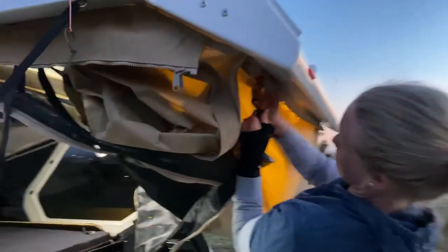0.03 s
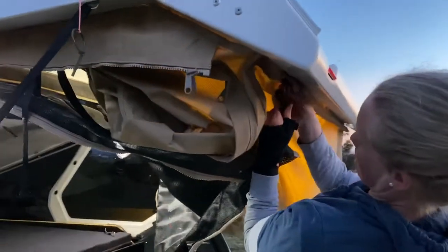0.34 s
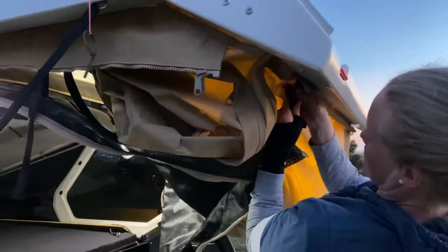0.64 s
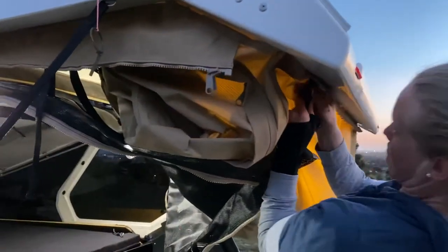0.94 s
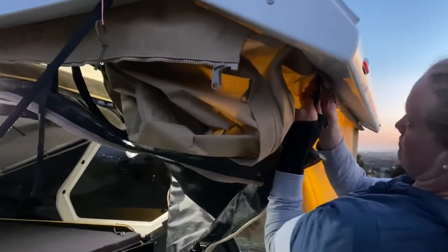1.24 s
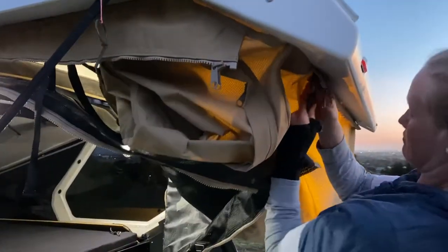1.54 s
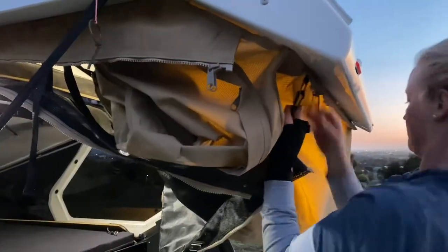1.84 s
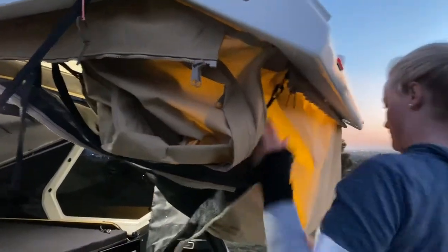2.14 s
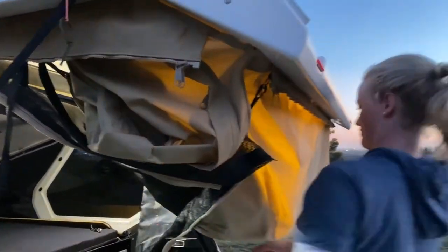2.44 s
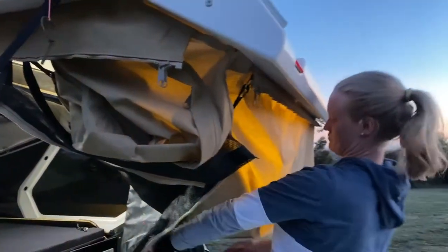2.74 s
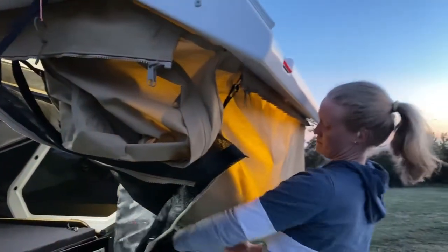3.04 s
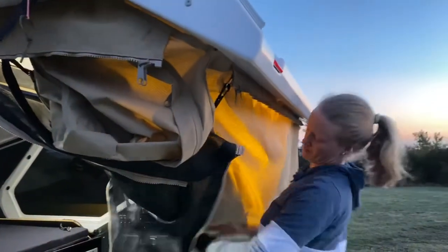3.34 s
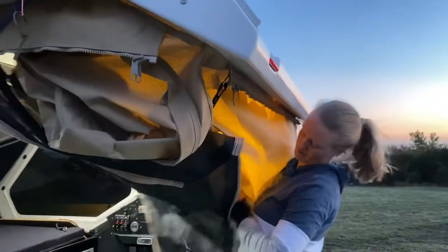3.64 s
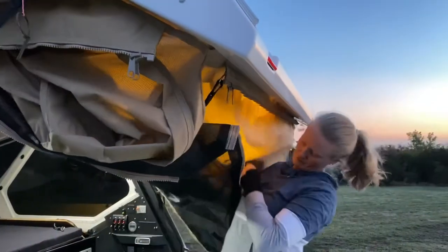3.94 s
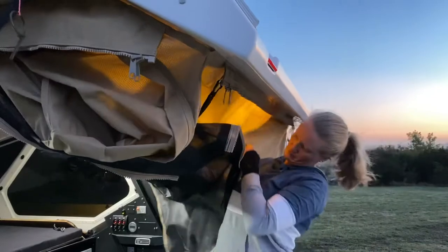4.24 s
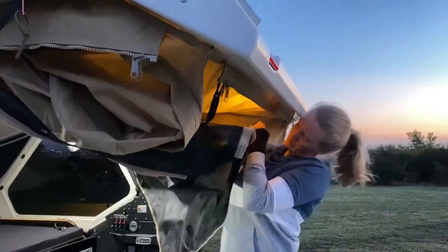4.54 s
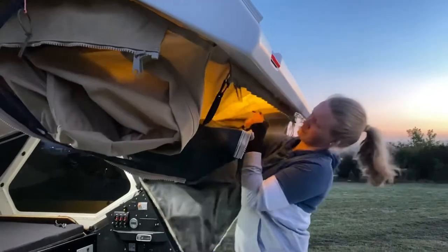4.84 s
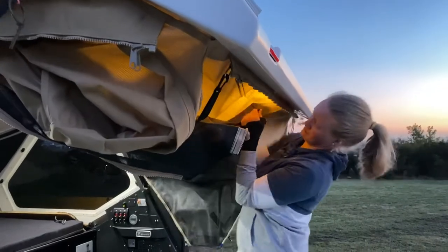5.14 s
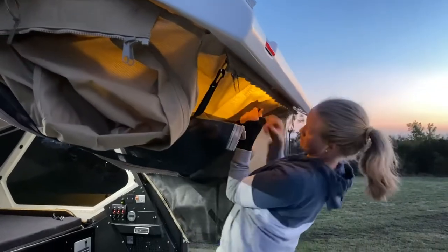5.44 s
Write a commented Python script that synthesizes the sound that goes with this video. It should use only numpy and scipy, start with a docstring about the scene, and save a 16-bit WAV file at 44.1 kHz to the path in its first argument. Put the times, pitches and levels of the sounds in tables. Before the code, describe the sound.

Outdoors, wind rumbles on the microphone as a nearby buckle clinks and heavy cloth flaps. After about a second comes one sharp click from a strap clip. The tent canvas then rubs and ticks quietly, swells into a long rustling pull and ends with a few more strokes and soft pats. Faint insects trill in the grass over a low hum.

```python
"""A field at dusk, where a canvas tent is tucked into its hard shell an arm's length away.
Stick-slip friction makes the cloth rub and hiss; creases tick, and flaps push the air in low pulses.
A metal buckle knocks and jingles in its free modes, and a strap clip snaps shut.
Wind rumbles at the microphone, two insects stridulate in the grass and a far bird peeps,
over a faint low hum."""
import sys
import numpy as np
from scipy import signal
from scipy.fft import rfft, irfft
from scipy.io import wavfile
from scipy.ndimage import uniform_filter1d

SR = 44100
rng = np.random.default_rng(int(sys.argv[2]) if len(sys.argv) > 2 else 0)


def put_to_file(sound):
    """Save the sound as 16-bit audio at rate SR, in the file named by the first command-line argument."""
    columns = np.atleast_2d(sound).T  # one column per channel
    safe = np.clip(columns, -1, 1)
    whole_steps = np.round(safe * 32767)
    wavfile.write(sys.argv[1], SR, whole_steps.astype(np.int16))


N = 246651
T = np.arange(N) / SR

# short hand strokes over the cloth: t/s, duration/s, level/dB, swell from start to end/dB, tautness/dB
HAND_STROKES = [(0.0, 0.29, -48, -7.5, -1), (0.378, .23, -60, 5, 3.5), (0.769, 0.016, -55, -2.5, -4.5),
                (0.846, 0.025, -64, 3, 3.5), (0.986, 0.011, -60.5, 5.5, 3.5), (1.144, 0.14, -60, -5.5, -.5),
                (1.405, 0.425, -59.5, 5, -3), (1.649, 0.019, -59.5, 5, 9.5), (1.865, 0.086, -51, -1, -1),
                (1.984, 0.15, -55.5, 1.5, 6.5), (2.172, 0.33, -64, -4, -3), (2.602, 0.012, -65.5, 4, 18),
                (3.016, 0.048, -65, 2, 6.5), (3.178, 0.12, -53, 3.5, -3), (4.617, .31, -48.5, -0.5, -0.5),
                (4.957, 0.13, -45.5, -1, 2.5), (5.111, 0.047, -51.5, -2, 10), (5.227, .37, -58.5, 3, 2)]
# the long pull that drags the canvas under the shell: t/s, level/dB, tautness/dB
LONG_PULL = [(3.3, -69, -3), (3.36, -47.5, 2), (3.52, -43.5, 1.5), (3.62, -40.5, 5.5), (3.82, -38.5, 3),
             (4.0, -43, 0.5), (4.27, -43, 1), (4.38, -38.5, -2.5), (4.46, -43, -1), (4.52, -56, -2.5),
             (4.6, -53.5, -1.5)]
# gusts at the microphone: t/s, half-width/s, level/dB
WIND_GUSTS = [(0.0, 0.08, -27.5), (0.153, 0.056, -33.5), (.42, 0.063, -41), (0.618, 0.061, -39),
              (1.376, 0.16, -53), (2.674, 0.1, -46.5), (3.303, 0.17, -52), (4.1, 0.42, -52),
              (5.246, 0.33, -46.5)]
# envelopes: t/s, level/dB
HUM_ENVELOPE = [(0, -39), (.5, -49), (.9, -47.5), (1.2, -59), (1.6, -56.5), (4.6, -57), (5.59, -51)]
TRILL_ENVELOPE = [(0, -60), (1.7, -71), (2.7, -55), (3.3, -58.5), (5.59, -67)]
# touches of the buckle on its fitting: t/s, relative level/dB, spectral tilt/(dB per octave)
BUCKLE_TOUCHES = [(0.018, -38, 4), (0.0607, -32, -7), (0.089, -33.5, 2), (.102, -36.5, 4), (0.165, -43, -3),
                  (.211, -40, 7), (.221, -38, 4), (.334, -53, -1), (1.912, -42, 9)]
# normal modes of the buckle: f/Hz, relative level/dB, T60/s
BUCKLE_MODES = [(3850, -5, 0.077), (3900, -3.5, 0.073), (4635, -9, 0.065), (4840, -18, .08),
                (6170, -2, 0.044), (6250, -14, 0.32), (7200, -11, 0.073), (7390, -4, 0.056),
                (7950, -22, 0.036), (8750, -10, 0.09), (8740, -11, 0.09), (11940, -17, 0.13),
                (14900, -21, .1)]
# flaps of the cloth: t/s, relative level/dB, f/Hz
CLOTH_FLAPS = [(0.019, -31, 150), (0.067, -35, 82.5), (0.119, -19.5, 130), (0.141, -20, 58.7),
               (0.169, -34, 76.6), (0.199, -20, 97.4), (0.216, -23.5, 62), (0.388, -31, 65.5),
               (0.424, -31.5, 169), (0.503, -32.5, 73), (0.625, -27.5, 102.6), (0.652, -27.5, 87.4),
               (1.206, -31, 151), (1.23, -34.5, 182), (1.879, -36.5, 122), (2.146, -30, 136),
               (2.325, -33, 151), (2.6, -40, 169), (2.65, -28.5, 72), (2.691, -42, 104),
               (3.142, -35.5, 165), (3.682, -32.5, 90), (4.225, -34, 169), (4.365, -35, 201),
               (5.12, -25, 165), (5.138, -28.5, 80), (5.17, -28.5, 149), (5.199, -28, 67.4),
               (5.255, -30.5, 143), (5.464, -34, 105)]
# ticks of creases and fittings: t/s, level/dB, centre f/Hz, prominence of the centre/dB
CREASE_TICKS = [(.087, -38, 13700, 17), (.2875, -40.5, 6200, 26), (0.4164, -30.5, 1480, -25),
                (.400, -42, 5000, 0), (.4405, -43, 6140, 12), (2.124, -33, 1480, -18),
                (2.435, -39, 2520, 18), (2.712, -52, 7900, 29), (2.776, -42.5, 3000, 15),
                (2.780, -48.5, 7850, 16), (2.828, -48.5, 7760, 29), (5.381, -46, 5000, 1),
                (5.4443, -32.5, 1500, -15), (5.560, -34.5, 900, 3)]
# bouts of the near insect: start t/s, end t/s, chirp rate/Hz, level/dB
CHIRP_BOUTS = [(.49, 1.17, 15.8, -53.5), (1.371, 1.9, 15.6, -57), (1.927, 2.67, 15.72, -52),
               (5.205, 5.59, 15.1, -51)]
# peeps of the far bird: t/s, start f/Hz, end f/Hz, duration/s, level/dB
BIRD_PEEPS = [(1.252, 5750, 6450, .028, -62), (1.285, 6550, 5850, .065, -67)]
# spectral densities: f/Hz, relative level/dB
WEAVE_SPECTRUM = [(240, -38.5), (400, 0.5), (549, 5), (678, 6), (941, 0), (1300, 1), (1630, -4.5),
                  (2310, -6), (2710, -6.5), (2980, -9.5), (3450, -8.5), (5000, -21.5), (6500, -33),
                  (11000, -120)]  # rubbing weave
THREAD_SPECTRUM = [(2940, -16.5), (5000, -5.5), (7980, -6), (9280, -15.5), (10300, -24.5), (10800, -24.5),
                   (11800, -23), (13200, -15), (13800, -13), (16000, -29)]  # taut threads
FLUTTER_SPECTRUM = [(20, -43), (70, -14), (130, 2.5), (200, 4), (300, 1), (390, -8.5), (600, -24),
                    (2000, -75)]  # slack cloth
WIND_SPECTRUM = [(8, -45), (25, -24), (38, -5.5), (55, -0.5), (75, 2.5), (100, 2), (140, -4), (250, -29.5),
                 (1000, -69)]  # air at the microphone
FIELD_SPECTRUM = [(25, -45), (60, -5.5), (100, -7), (200, -12.5), (350, -13), (600, -15), (1000, -12),
                  (1600, -26), (2700, -30), (3600, -20), (4600, -29), (7400, -33), (10500, -49.5),
                  (14000, -35), (16000, -43)]  # distant evening wash
KNOCK_SPECTRUM = [(100, -29), (700, -20), (1150, 1.5), (2000, 3.5), (2700, 2), (3900, 2), (6200, 2),
                  (7500, -6), (8800, -21), (10500, -31), (13000, -26), (16000, -32)]  # buckle on the frame
PAT_SPECTRUM = [(60, -23), (160, -5.5), (280, 2), (400, -12), (700, -19), (2000, -34), (6000, -60)]  # a flap landing
LATCH_SPECTRUM = [(100, 1.5), (400, -12), (750, 4), (1100, -11.5), (1900, -23), (2500, -0.5), (3000, 1.5),
                  (3800, 0), (4900, -5.5), (5700, -2), (6900, -4.5), (8500, -15), (11500, -16.5),
                  (14500, -12), (16000, -8)]  # latch of the strap clip


def undb(db):
    """Amplitude ratio for a level in decibels."""
    return np.exp(np.asarray(db) * np.log(10) / 20)


def unit(x):
    """Normalisation to unit rms."""
    return x / np.sqrt(np.mean(x ** 2))


def contour(table):
    """Linear interpolation of a level over time."""
    return np.interp(T, *np.transpose(table))


def colour(x, spectrum, size=8192):
    """Minimum-phase filtering with the given spectral shape and unit power gain."""
    hz, db = np.transpose(spectrum)
    f = np.maximum(np.arange(size // 2 + 1) * SR / size, 1)
    magnitude = unit(undb(np.interp(np.log(f), np.log(hz), db)))
    cepstrum = irfft(np.log(magnitude))
    cepstrum[1:size // 2] *= 2  # folding the cepstrum makes the filter causal
    cepstrum[size // 2 + 1:] = 0
    return signal.oaconvolve(x, irfft(np.exp(rfft(cepstrum))))[:len(x)]


def walk(rate_hz):
    """Smooth random modulation of unit rms."""
    hold = max(int(SR / rate_hz), 1)
    steps = np.repeat(rng.standard_normal(N // hold + 1), hold)
    return unit(uniform_filter1d(steps, hold)[:N])


def fade(t, t60):
    """Exponential decay, 60 dB down after t60."""
    return np.exp(-np.log(1000) * t / t60)


def add(out, s, x):
    """Superposition of x on out from time s."""
    i = int(s * SR)
    x, i = x[max(-i, 0):], max(i, 0)
    out[i:i + len(x)] += x[:max(N - i, 0)]


def slips(rate_hz, spread_db):
    """Shot noise: threads slip over threads in random impulses of unequal size."""
    size = undb(spread_db * np.minimum(rng.exponential(size=N), 5))
    return unit((rng.random(N) < rate_hz / SR) * size * rng.standard_normal(N))


def impact(spectrum, crack_t60, tail_db, tail_t60):
    """Impulsive excitation: a brief crack, then its scatter under the shell; peak near 1."""
    t = T[:SR // 4]
    grain = np.sign(rng.standard_normal(len(t)))
    hit = colour(grain * (fade(t, crack_t60) + undb(tail_db) * fade(t, tail_t60)), spectrum)
    return hit / (2 * np.sqrt(np.mean(hit[:SR // 500] ** 2)))


def glide(start_hz, end_hz, length_s):
    """A linear frequency sweep, slightly detuned at random, under a half-sine envelope."""
    progress = np.linspace(0, 1, int(length_s * SR))
    hz = (start_hz + (end_hz - start_hz) * progress) * (1 + 0.013 * rng.standard_normal())
    return np.sin(np.pi * progress) * np.sin(2 * np.pi * np.cumsum(hz) / SR)


def handling(attack_s=0.031, release_s=0.054, resting_db=-64.5):
    """Incoherent addition: the powers of all strokes sum, and tautness is their power-weighted mean."""
    t = np.arange(0, T[-1], .002)
    pull_s, pull_db, pull_taut = np.transpose(LONG_PULL)
    pull = np.interp(t, pull_s, undb(pull_db), left=0, right=0) ** 2
    power = undb(resting_db) ** 2 + pull  # the cloth never lies quite still
    weighted_taut = pull * np.interp(t, pull_s, pull_taut)
    for s, length, db, swell_db, taut_db in HAND_STROKES:
        outside = np.maximum(s - t, 0) / attack_s + np.maximum(t - s - length, 0) / release_s
        from_middle = np.clip((t - s) / length - .5, -.5, .5)
        stroke = (undb(db + swell_db * from_middle) * np.exp(-outside - outside ** 2 / 2)) ** 2
        power += stroke
        weighted_taut += stroke * taut_db
    return np.interp(T, t, 10 * np.log10(power)), np.interp(T, t, weighted_taut / power)


def canvas(split_hz=1550):
    """Stick-slip friction of the weave: taut cloth rasps and hisses, slack cloth flutters."""
    rub_db, taut_db = handling()
    weave = colour(slips(rate_hz=9000, spread_db=-0.2), WEAVE_SPECTRUM)
    soft_contact = signal.sosfiltfilt(signal.butter(3, split_hz, fs=SR, output="sos"), weave)
    threads = colour(slips(rate_hz=14000, spread_db=1.8), THREAD_SPECTRUM)
    slack = colour(slips(rate_hz=900, spread_db=2.0), FLUTTER_SPECTRUM)
    rub = unit(soft_contact) * undb(rub_db)
    rasp = unit(weave - soft_contact) * undb(rub_db - 3 + 0.99 * taut_db)
    hiss = unit(threads) * undb(rub_db - 9 + 1.31 * taut_db)
    flutter = unit(slack) * undb(rub_db + 1 - 0.33 * taut_db)
    uneven_pull = undb(0.68 * walk(35))
    return (rub + rasp + hiss + flutter) * uneven_pull


def wind(breeze_db=-51.5):
    """Turbulent pressure at the microphone: a low rumble that swells with each gust."""
    gusts = sum(undb(db) * np.exp(-((T - s) / width) ** 2) for s, width, db in WIND_GUSTS)
    rumble = unit(colour(rng.standard_normal(N), WIND_SPECTRUM))
    return rumble * (undb(breeze_db) + gusts) * undb(2.06 * walk(5.32))


def hum(hz=50.8):
    """Random modulation of frequency and amplitude makes a low tone waver."""
    phase = 2 * np.pi * np.cumsum(hz * (1 + 0.016 * walk(6.13))) / SR
    return np.sin(phase) * undb(contour(HUM_ENVELOPE) + 2 * walk(3.5))


def evening_wash(level_db=-59):
    """Ambient noise: the distant field merges into a broad, nearly stationary spectrum."""
    return unit(colour(rng.standard_normal(N), FIELD_SPECTRUM)) * undb(level_db + 0.44 * walk(2.07))


def far_insect(rate_hz=63.5):
    """Stridulation: a nearly periodic train of falling tone pulses is heard as a trill."""
    out = np.zeros(N)
    for s in np.arange(0, T[-1], 1 / rate_hz):
        add(out, s + .001 * rng.standard_normal(), glide(start_hz=3950, end_hz=3100, length_s=.008))
    return out * undb(contour(TRILL_ENVELOPE))


def field_scatter(song, t60=.12, level_db=-6):
    """Scattering in the field adds a short diffuse tail to the direct sound."""
    tail = rng.standard_normal(SR // 4) * fade(T[:SR // 4], t60)
    return song + undb(level_db) * signal.fftconvolve(song, tail / np.linalg.norm(tail))[:N]


def buckle(knock_s=.0585, uneven_db=2.5, pivot_hz=7000):
    """Modal vibration: the buckle rings at each touch and knocks once on the frame."""
    out, t = np.zeros(N), T[:SR // 3]
    add(out, knock_s, undb(-10) * impact(KNOCK_SPECTRUM, crack_t60=0.012, tail_db=-11, tail_t60=0.12))
    for s, db, tilt in BUCKLE_TOUCHES:
        ring = np.zeros(len(t))
        for hz, mode_db, t60 in BUCKLE_MODES:
            strength, detune = rng.standard_normal(2)
            # light, hard touches favour the high modes
            gain = undb(mode_db + tilt * np.log2(hz / pivot_hz) + uneven_db * strength)
            ring += gain * np.sin(2 * np.pi * hz * (1 + 0.0012 * detune) * t) * fade(t, t60)
        bounces = np.cumsum(rng.uniform(.004, .014, size=4))  # loose metal chatters, ever weaker
        for k, lag in enumerate([0, *bounces]):
            add(out, s + lag, undb(db - 6.5 - 4.2 * k) * ring)
    return out


def flaps(width_cycles=0.44, pat_t60=0.15, pat_reference_hz=150):
    """Rarefaction and rebound: each flap moves the air for about a cycle; quick ones pat harder."""
    out, t = np.zeros(N), np.arange(-SR // 20, SR // 20) / SR
    for s, db, hz in CLOTH_FLAPS:
        suction = -np.cos(2 * np.pi * hz * t) * np.exp(-.5 * (t * hz / width_cycles) ** 2)
        add(out, s + t[0], undb(db + 2.5) * suction)
        pat = colour(rng.standard_normal(len(t)) * fade(T[:len(t)], pat_t60), PAT_SPECTRUM)
        add(out, s - 1 / hz, undb(db - 12.5) * (hz / pat_reference_hz) ** 2 * pat)
    return out


def ticks():
    """Creases snap through and fittings touch: transients, each with a spectral peak or notch."""
    out = np.zeros(N)
    for s, db, hz, prominence_db in CREASE_TICKS:
        shoulder_db = -prominence_db
        below = [(hz / 30, shoulder_db - 47), (hz / 5, shoulder_db), (hz / 1.2, shoulder_db)]
        above = [(hz * 1.3, shoulder_db), (hz * 3.6, shoulder_db - 20), (hz * 5.5, shoulder_db - 43)]
        tick = impact([*below, (hz, 0), *above], crack_t60=.014, tail_db=-15, tail_t60=.05)
        add(out, s, undb(db) * tick)
    return out


def near_insect(pair_s=.019, uneven_db=1.6):
    """Stridulation in bouts: each chirp is a pair of wing strokes that fall in pitch."""
    out = np.zeros(N)
    for start, end, rate_hz, db in CHIRP_BOUTS:
        for s in np.arange(start, end, 1 / rate_hz):
            for lag in (0, pair_s):
                stroke = glide(start_hz=3980, end_hz=3340, length_s=.014)
                add(out, s + lag, undb(db + uneven_db * rng.standard_normal()) * stroke)
    return out


def strap_clip(snap_s=1.1937, body_hz=765, body_db=-38, body_t60=0.14):
    """Elastic release: the latch scrapes over its catch, springs home and rings the hollow body."""
    out, t = np.zeros(N), T[:SR // 4]
    scrape = undb(-20) * impact(LATCH_SPECTRUM, crack_t60=.005, tail_db=-30, tail_t60=.02)
    snap = undb(-9.5) * impact(LATCH_SPECTRUM, crack_t60=0.0072, tail_db=-25, tail_t60=0.084)
    body = undb(body_db) * np.sin(2 * np.pi * body_hz * t) * fade(t, body_t60)
    add(out, snap_s - .0005, scrape)
    add(out, snap_s, snap + body)
    return out


def bird():
    """Frequency-modulated tones: two faint peeps, one rising, one falling."""
    out = np.zeros(N)
    for s, start_hz, end_hz, length_s, db in BIRD_PEEPS:
        add(out, s, undb(db) * glide(start_hz, end_hz, length_s))
    return out


def scene():
    """Linear superposition: the pressures of all sources add at one microphone."""
    tent = canvas() + flaps() + ticks() + buckle() + strap_clip()
    wildlife = field_scatter(near_insect() + far_insect()) + bird()
    return (tent + wildlife + wind() + hum() + evening_wash())[None]


def record(dry):
    """Band limiting: a steep elliptic low-pass removes the treble above 15.9 kHz."""
    return signal.sosfilt(signal.ellip(10, .2, 80, 15900, fs=SR, output="sos"), dry)


dry = scene()
out = record(dry)
put_to_file(out)
```